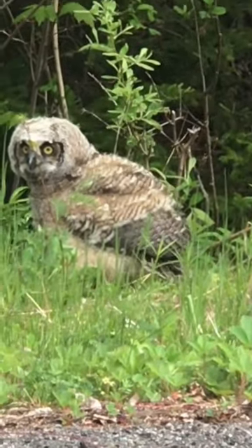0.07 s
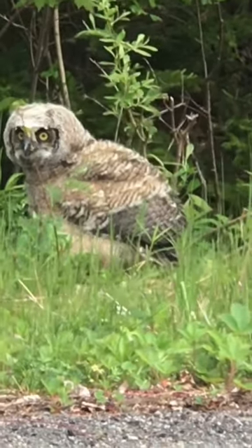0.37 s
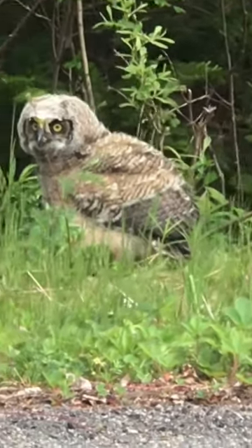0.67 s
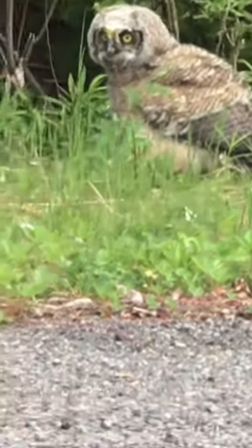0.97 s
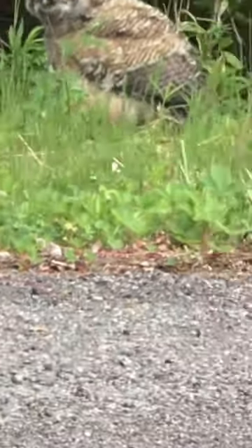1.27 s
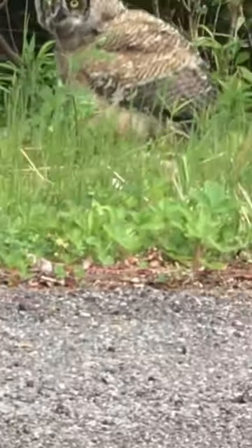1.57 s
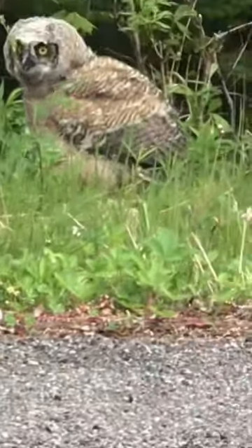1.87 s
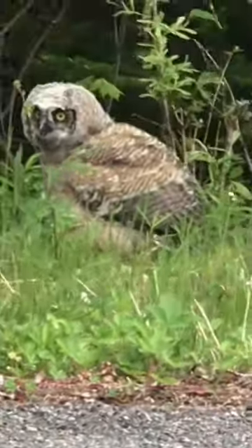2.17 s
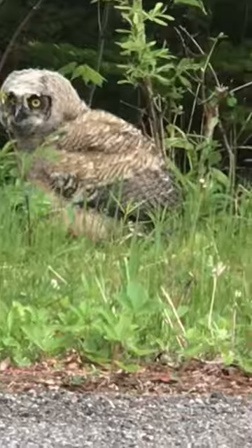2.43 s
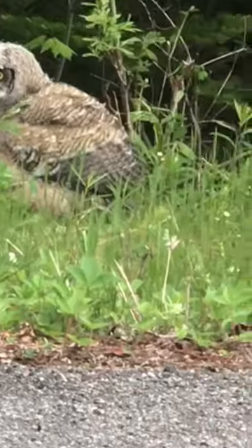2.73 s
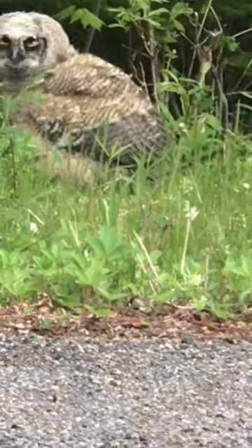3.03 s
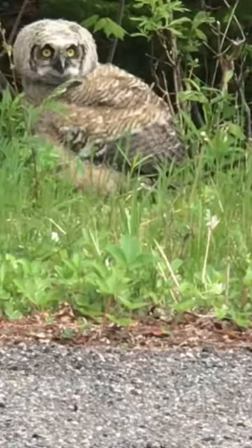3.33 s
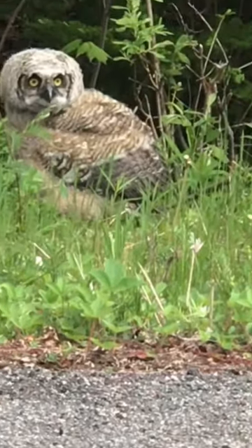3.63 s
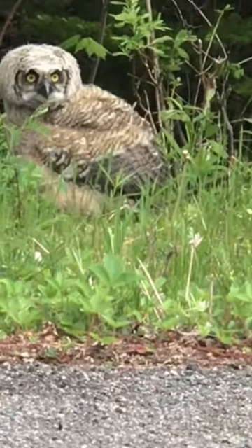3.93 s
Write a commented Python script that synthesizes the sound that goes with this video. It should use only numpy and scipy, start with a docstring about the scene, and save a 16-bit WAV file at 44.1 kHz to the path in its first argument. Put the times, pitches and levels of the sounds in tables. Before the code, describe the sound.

Three sharp bill clicks from an owl, with an engine humming and songbirds far off.

```python
"""An engine idles close by throughout, humming at its firing rate over a faint outdoor hiss.
From 0.4 s small songbirds whistle far back in a wood, blurred by the trees. Around 1 s a hand
bumps, scuffs and squeaks on a camera. Between 1.3 and 1.6 s a young owl on a grassy verge snaps
its bill three times, each blow briefly ringing bill and mouth. More soft bumps follow, the song
dies away after 2.5 s, and light ticks and brushings of the hand come last."""
import sys
import numpy as np
from scipy import signal
from scipy.fft import rfft, irfft, next_fast_len
from scipy.io import wavfile
from scipy.ndimage import map_coordinates

SR = 44100
rng = np.random.default_rng(int(sys.argv[2]) if len(sys.argv) > 2 else 0)


def master_out(mix):
    """Clip the mix to full scale and print it as 16-bit PCM to the path in sys.argv[1]."""
    frames = np.transpose(np.atleast_2d(mix))
    ceiling = np.clip(frames, -1, 1)
    pcm = np.round(ceiling * 32767).astype(np.int16)
    wavfile.write(sys.argv[1], SR, pcm)


N = 176400


def amp(db):
    """Decibels to gain."""
    return 10 ** (np.asarray(db) / 20)


def curve(rows):
    """(s, value) points joined by straight lines."""
    return np.interp(np.arange(N) / SR, *np.transpose(rows))


def wobble(rate_hz):
    """Smooth random curve, rate_hz knots a second."""
    knots = rng.standard_normal(int(N * rate_hz / SR) + 4)
    return map_coordinates(knots, [np.arange(N) * rate_hz / SR])


def filtered(x, response):
    """Apply a gain given as a function of Hz."""
    size = next_fast_len(N + SR // 2)
    return irfft(rfft(x, size) * response(np.fft.rfftfreq(size, 1 / SR)), size)[:N]


def noise(spectrum):
    """Noise of rms 1 with a (Hz, dB) colour."""
    points_hz, db = np.transpose(spectrum)
    gain = lambda hz: amp(np.interp(np.log(hz + 1), np.log(points_hz), db))
    coloured = filtered(rng.standard_normal(N), gain)
    return coloured / np.sqrt(np.mean(coloured ** 2) + 1e-20)


def add(track, start_s, sound):
    """Mix a sound into a track."""
    part = track[round(start_s * SR):][:len(sound)]
    part += sound[:len(part)]


def echoes(x, t60_s):
    """Diffuse echoes of x: convolution with a decaying noise tail of unit energy."""
    t = np.arange(SR) / SR
    tail = rng.standard_normal(SR) * np.exp(-np.log(1000) * t / t60_s)
    return signal.fftconvolve(x, tail / np.linalg.norm(tail))[:len(x)]


def struck(gain):
    """Minimum-phase impulse response of a body with this gain spectrum."""
    cepstrum = irfft(np.log(np.maximum(gain, 1e-6)))
    half = len(cepstrum) // 2
    cepstrum[1:half] *= 2
    cepstrum[half + 1:] = 0
    return irfft(np.exp(rfft(cepstrum)))


def swell(start_s, rise_s):
    """Envelope that peaks at 1 after rise_s, then dies away."""
    u = np.maximum(np.arange(N) / SR - start_s, 0) / rise_s
    return (u * np.exp(1 - u)) ** 2


# Bill snaps. Each row: start in seconds, gain in dB, tilt in dB per octave about 1 kHz.
BILL_SNAPS = [(1.2864, -7.5, -0.05), (1.4378, -6, 0.5), (1.6195, -6, -0.54)]
# Resonances of bill and mouth. Each row: centre in Hz, width in Hz, gain in dB.
BILL_MODES = [(613, 300, 1), (790, 260, -1), (1430, 580, -0.5), (1990, 350, 1.5), (2960, 480, -2),
              (3820, 560, -4), (5820, 780, -12.5), (6750, 400, -16), (8300, 600, -20), (11100, 1100, -24),
              (14200, 1800, -25)]

def owl():
    """Each snap is one blow into the heavily damped bill and mouth, scattered by the grass."""
    low_cut_hz, skirt_exponent, spread_db = 480, 1.33, 0.5
    grass_db, grass_t60_s = -10.5, 0.033
    out = np.zeros(N)
    hz = np.fft.rfftfreq(SR // 5, 1 / SR)
    low_cut = hz ** 2 / np.hypot(hz ** 2, low_cut_hz ** 2)
    octaves = np.log2((hz + 1) / 1000)
    for start_s, db, tilt in BILL_SNAPS:
        power = 0
        for centre_hz, width_hz, mode_db in BILL_MODES:
            resonance = abs(hz * width_hz / (centre_hz ** 2 - hz ** 2 + 1j * hz * width_hz))
            power += (amp(mode_db + spread_db * rng.normal()) * resonance ** skirt_exponent) ** 2
        snap = struck(amp(db + tilt * octaves) * np.sqrt(power) * low_cut)
        add(out, start_s, snap + amp(grass_db) * echoes(snap, grass_t60_s))
    return out


# Idle speed. Each row: time in seconds, firing rate in Hz.
FIRING_RATE = [(0, 62.38), (.7, 61.82), (1.15, 62.44), (1.7, 63.47), (2.3, 63.21), (2.8, 62.5), (4, 62.25)]
# Engine hum. Each row: time in seconds, relative level in dB.
HUM_LEVEL = [(0, -38), (.18, -34.5), (.38, -37), (.82, -35), (.91, -42), (.97, -38), (1.17, -33),
             (1.22, -45), (1.26, -34), (1.34, -35.5), (1.46, -49), (1.5, -37.5), (2.26, -35.5),
             (2.34, -42.5), (2.44, -41), (2.48, -35.5), (2.88, -38.5), (2.94, -32), (2.97, -46),
             (3.12, -37), (3.85, -36), (3.89, -50), (3.95, -39), (4, -34.5)]
# Engine overtones. Each row: multiple of the firing rate, level in dB.
OVERTONES = [(1.5, -55), (2, -49), (3, -53.5), (4.75, -60), (10.3, -72.5), (18.85, -78)]
# Engine rumble. Each row: frequency in Hz, relative level in dB.
RUMBLE_SPECTRUM = [(15, -16), (28, -26), (45, 0), (85, -1), (150, -3.5), (200, -10), (300, -13), (400, -20),
                   (500, -33.5), (900, -57.5)]

def engine():
    """Idle: a wavering hum at the firing rate, unsteady overtones and a low rumble."""
    hum_gain_db, rumble_db, waver_db, drift_rad = 0.5, -42.5, 1, 0.23
    phase = 2 * np.pi * np.cumsum(curve(FIRING_RATE)) / SR
    tones = amp(curve(HUM_LEVEL) + hum_gain_db) * np.sin(phase)
    for multiple, db in OVERTONES:
        drift = rng.uniform(0, 2 * np.pi) + drift_rad * wobble(8)
        tones += amp(db + waver_db * wobble(10)) * np.sin(multiple * phase + drift)
    return np.sqrt(2) * tones + amp(rumble_db) * noise(RUMBLE_SPECTRUM)


# Hand bumps. Each row: start in seconds, envelope peak in dB, pitch in Hz.
HAND_BUMPS = [(.795, -34, 90), (1.065, -37, 106), (1.122, -32.5, 85), (2.141, -26.5, 88.5),
              (2.286, -27.5, 95.6), (2.919, -32, 78)]

def bumps():
    """The hand knocks the camera: soft, low thuds."""
    t = np.arange(N) / SR
    return sum(amp(db) * swell(start_s, rise_s=0.011) * np.sin(2 * np.pi * hz * (t - start_s))
               for start_s, db, hz in HAND_BUMPS)


# Dull scuffs, dry brushings, light ticks. Each row: start in seconds, level in dB, rise in seconds.
HAND_SCUFFS = [(.314, -50, .007), (1.058, -43.5, .005), (1.069, -45, .009), (1.108, -48.5, .016)]
HAND_BRUSHES = [(1.081, -56, 0.0034), (1.086, -59, 0.031), (1.112, -72, 0.012), (2.921, -61, .003),
                (2.927, -57, .003), (3.558, -63, .002), (3.665, -62, 0.0074), (3.69, -71, .07)]
HAND_TICKS = [(2.9295, -55.5, 0.0028), (3.448, -65, .002), (3.479, -67, 0.0031), (3.496, -58.5, 0.0018),
              (3.6622, -46, 0.003)]
# Their spectra. Each row: frequency in Hz, relative level in dB.
SCUFF_SPECTRUM = [(100, 0), (180, 7), (330, 6), (480, -3), (650, -2), (900, -4), (1200, -9), (1500, -10),
                  (3000, -34), (8000, -51), (15000, -64)]
BRUSH_SPECTRUM = [(500, -20), (1500, -6), (3500, -1), (6500, -5.5), (10000, -13), (12500, -10),
                  (15500, -12)]
TICK_SPECTRUM = [(800, -38), (2050, -19), (2550, 1.5), (4100, -2), (5500, 0), (7200, -8.5), (9000, -10),
                 (10500, -17), (12000, -13), (15500, -26)]

def rubs():
    """The hand scuffs, brushes and ticks on the camera: short bursts of friction noise."""
    out = np.zeros(N)
    for bursts, spectrum in ((HAND_SCUFFS, SCUFF_SPECTRUM), (HAND_BRUSHES, BRUSH_SPECTRUM),
                             (HAND_TICKS, TICK_SPECTRUM)):
        envelope = sum(amp(db) * swell(start_s, rise_s) for start_s, db, rise_s in bursts)
        out += envelope * noise(spectrum)
    return out


def squeak(start_s=1.121, length_s=0.032, start_hz=740, end_hz=1000, peak_db=-53.5, roughness=0.1):
    """A finger slips on the housing: a brief, rough, rising tone."""
    out = np.zeros(N)
    u = np.linspace(0, 1, int(length_s * SR))
    glide_hz = start_hz + (end_hz - start_hz) * u
    hz = glide_hz * (1 + roughness * wobble(506)[:len(u)])
    add(out, start_s, amp(peak_db) * np.sin(np.pi * u) * np.sin(2 * np.pi * np.cumsum(hz) / SR))
    return out


# Song notes. Each row: start and length in seconds, first, middle and last pitch in Hz,
# relative level in dB.
SONG_NOTES = [(0.356, 0.22, 5400, 5450, 5290, -74), (0.501, .22, 4300, 4500, 4750, -70.5),
              (0.631, 0.094, 7100, 7800, 8950, -74.5), (0.697, 0.036, 4120, 4250, 5320, -64),
              (0.713, 0.025, 5600, 4720, 4100, -66), (0.722, .09, 5470, 5800, 5900, -75),
              (0.776, .05, 7800, 7850, 7800, -78), (0.824, 0.039, 4190, 4120, 4120, -62),
              (.865, .04, 5500, 5450, 5400, -67), (0.862, 0.17, 6900, 7460, 6800, -77),
              (.95, .12, 3800, 4400, 4660, -69), (1.0, .09, 4920, 5200, 5400, -73),
              (1.151, 0.029, 4370, 4150, 4040, -64.5), (1.19, 0.027, 5400, 5450, 5450, -66),
              (1.22, .06, 4350, 4500, 4570, -68), (1.29, 0.05, 6400, 6900, 7300, -70),
              (1.333, 0.039, 3320, 3700, 4270, -64), (1.351, 0.068, 6730, 6400, 6370, -72),
              (1.386, .04, 3480, 4000, 4620, -67), (1.461, 0.21, 6730, 7800, 8130, -78),
              (1.584, 0.046, 3210, 3700, 4300, -63.5), (1.635, 0.027, 3530, 3950, 4600, -67),
              (1.665, 0.068, 6870, 6350, 6230, -70), (1.671, .035, 3400, 3000, 2720, -67),
              (1.775, 0.052, 6550, 6900, 7050, -72), (1.819, .045, 3103, 3600, 4350, -62.5),
              (1.83, .09, 7140, 7400, 7400, -86), (1.876, .035, 3500, 3900, 4730, -68),
              (1.925, .055, 6700, 6300, 5400, -69.5), (2.019, 0.051, 6500, 6200, 6200, -73.5),
              (2.058, 0.057, 5100, 4100, 3080, -65.5), (2.11, .12, 6360, 6600, 6500, -78),
              (2.135, 0.053, 6800, 7200, 7400, -77), (2.195, 0.047, 4900, 3950, 2900, -64.5),
              (2.237, .05, 7100, 6700, 5700, -78), (2.325, .05, 5200, 4000, 2900, -64.5),
              (2.465, .045, 4870, 3700, 2800, -68)]
# Song that arrives unscattered. Each row: time in seconds, gain in dB.
DIRECT_GAIN = [(.4, -6), (.8, -1.5), (1.0, -3), (1.4, -2.5), (2.1, -3), (2.5, -4)]

def songbirds():
    """Thin gliding whistles; the trees scatter them into a blurred, lingering haze."""
    gain_db, flutter_db, roundness = -2.5, 2.5, 0.46  # roundness: 0 abrupt, 1 gentle swell
    direct, scattered = np.zeros(N), np.zeros(N)
    warble = 1 + 0.0162 * wobble(250)
    flutter = amp(flutter_db * wobble(120))
    smear = 1 + 0.0501 * wobble(700)
    for start_s, length_s, *pitches_hz, db in SONG_NOTES:
        u = np.linspace(0, 1, int(length_s * SR))
        span = round(start_s * SR) + np.arange(len(u))
        glide = np.polyfit([0, 0.5, 1], pitches_hz, 2)
        hz = np.polyval(glide, u) * warble[span]
        arch = abs(np.sin(np.pi * u)) ** roundness
        envelope = np.sqrt(2) * amp(db + gain_db) * arch * flutter[span]
        add(direct, start_s, envelope * np.sin(2 * np.pi * np.cumsum(hz) / SR))
        add(scattered, start_s, envelope * np.sin(2 * np.pi * np.cumsum(hz * smear[span]) / SR))
    return amp(curve(DIRECT_GAIN)) * direct + echoes(scattered, t60_s=1.34)


# Hiss loudness. Each row: time in seconds, level in dB.
HISS_LEVEL = [(0, -57), (1.2, -56.5), (2.2, -57), (3.2, -58), (4, -57.5)]
# Hiss colour. Each row: frequency in Hz, relative level in dB.
HISS_SPECTRUM = [(100, -0.5), (450, 1), (650, 1.5), (850, -2.5), (1150, -2.5), (1600, -8.5), (2100, -7.5),
                 (2700, -12.5), (4000, -17.5), (5000, -20.5), (7500, -28), (9300, -28), (10400, -36.5),
                 (11800, -29), (15500, -34)]

def air(waver_db=0.4):
    """Faint outdoor hiss that eases a little."""
    return amp(curve(HISS_LEVEL) + waver_db * wobble(4.97)) * noise(HISS_SPECTRUM)


def scene():
    """All sources summed to one channel."""
    return (owl() + engine() + air() + songbirds() + bumps() + squeak() + rubs())[None]


def record(dry):
    """Brick-wall low-pass."""
    cutoff_hz = 15800
    return filtered(dry[0], lambda hz: hz < cutoff_hz)[None]


dry = scene()
out = record(dry)
master_out(out)
```